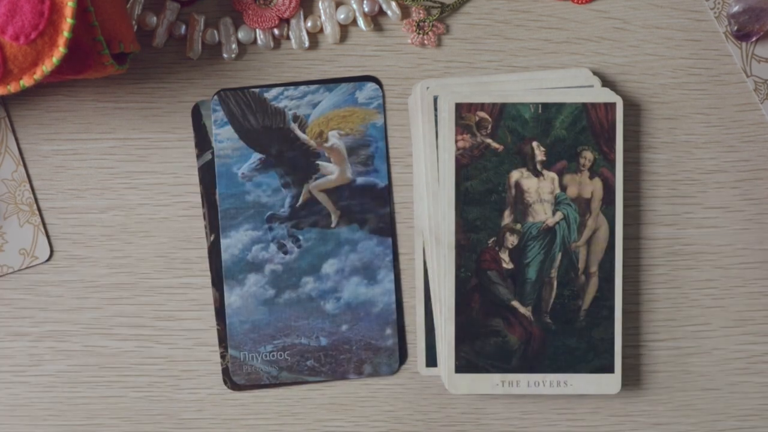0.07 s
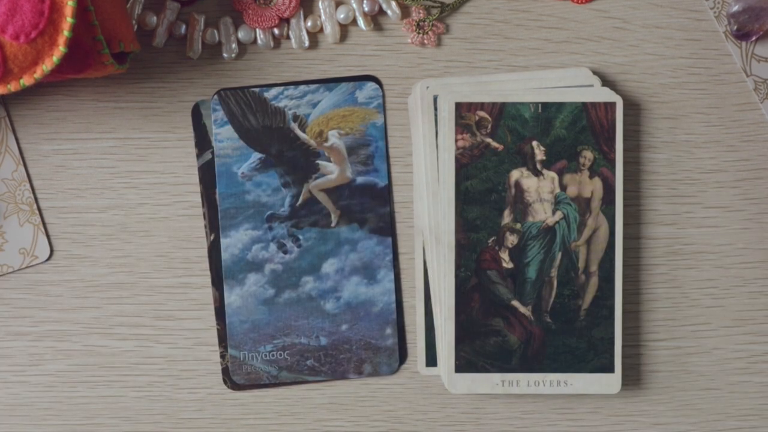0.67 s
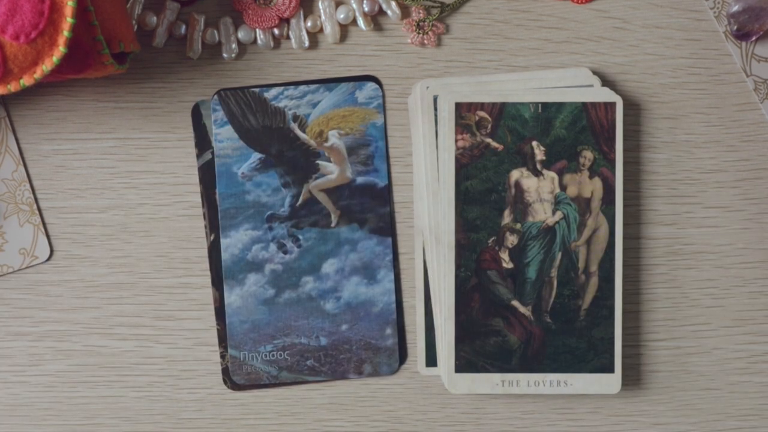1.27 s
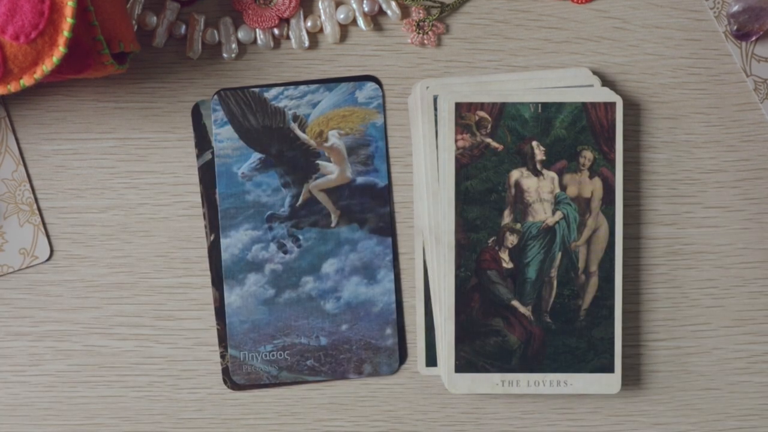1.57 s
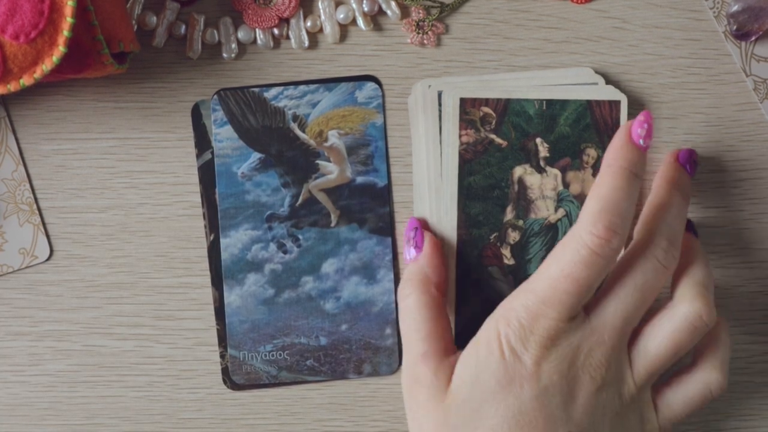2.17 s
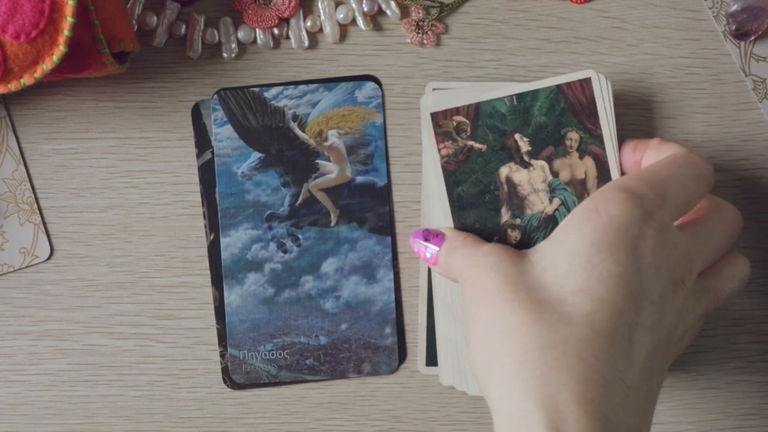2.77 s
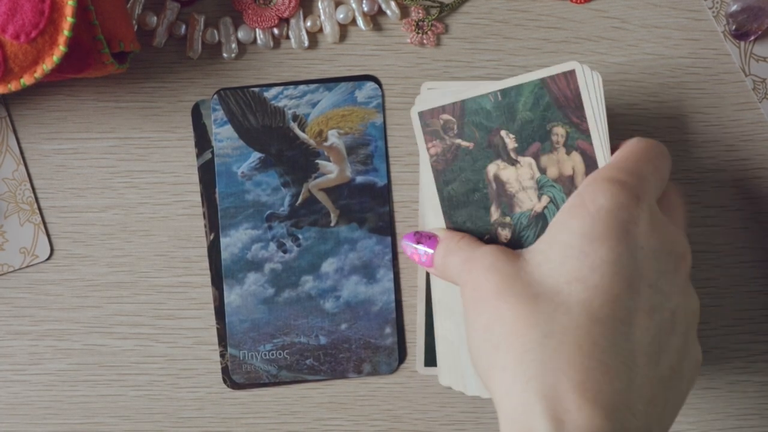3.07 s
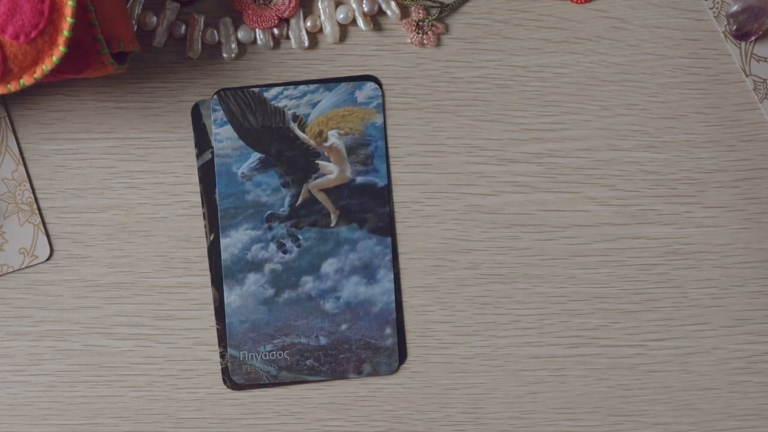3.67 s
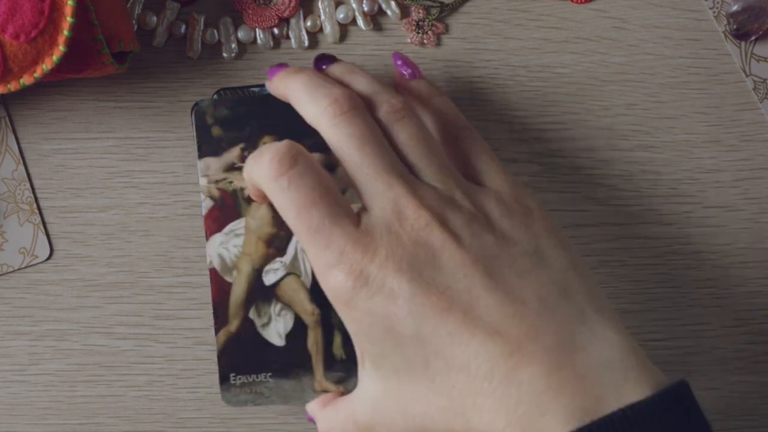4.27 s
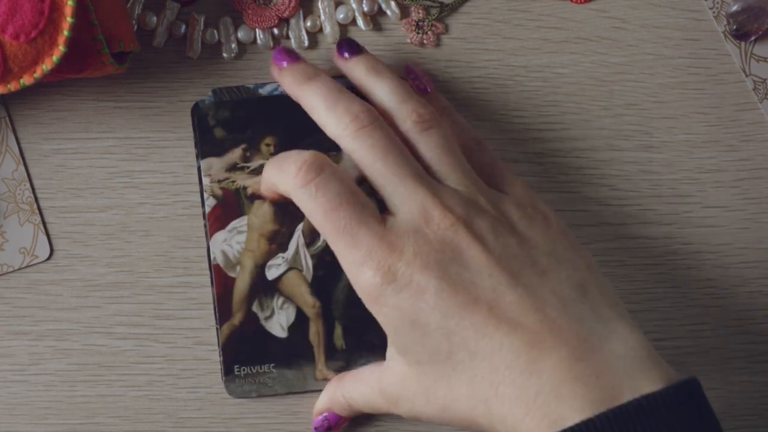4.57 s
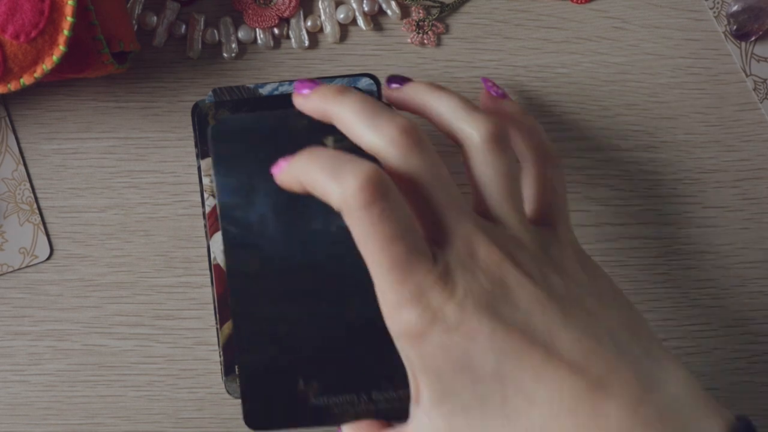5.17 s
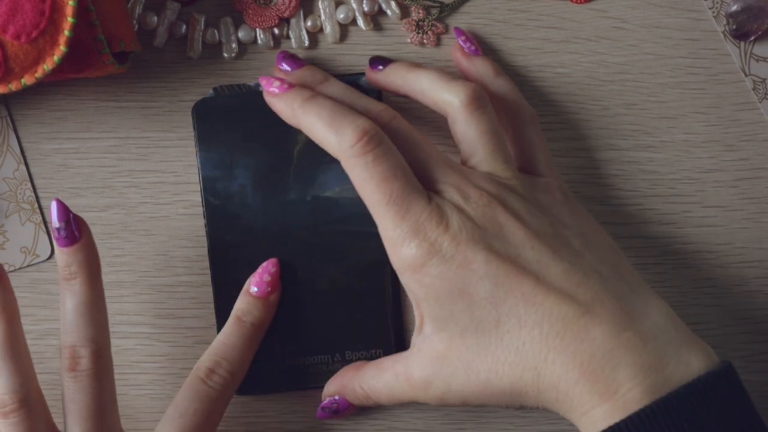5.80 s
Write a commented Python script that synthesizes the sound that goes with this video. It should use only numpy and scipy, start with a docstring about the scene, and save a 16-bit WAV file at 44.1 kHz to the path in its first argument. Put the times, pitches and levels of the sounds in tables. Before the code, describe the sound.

Paper cards brush against each other with small, crisp edge snaps, heard up close in a small, quiet room. A deck scrapes across a wooden tabletop with a low rub, followed by a sharp fingernail tap and thin rasps of bending cards. In the second half, cards are put down twice with short, hollow knocks and clicks. A faint rush of air and fine hiss sit underneath.

```python
"""A quiet room, close to a wooden table where tarot cards are being handled.
Cards rub on each other and on the wood, edges snap free, bent cards sing as they are dragged,
and a fingernail chatters over a packet. Packets and fingers land with a short, hollow ring of the table.
Air rushes faintly behind. Three times the sound dips briefly and comes back with a fine hiss."""
import sys
import numpy as np
from scipy import signal
from scipy.fft import rfft, irfft, next_fast_len
from scipy.io import wavfile
from scipy.ndimage import map_coordinates

SR = 44100
rng = np.random.default_rng(int(sys.argv[2]) if len(sys.argv) > 2 else 0)


def to_wav(sig):
    """Store sig (one row per channel, or 1-D mono) as 16-bit WAV at the path in sys.argv[1].

    Samples outside -1..1 are clipped; the rate is SR.
    """
    pcm = np.clip(np.atleast_2d(sig), -1, 1) * 32767
    pcm = np.round(pcm).astype(np.int16)
    wavfile.write(sys.argv[1], SR, pcm.T)  # frames by channels


N = 266231
TIME = np.arange(N) / SR


def from_db(db):
    """Turn decibels (dB) into a number to multiply by."""
    return 10 ** (np.asarray(db) / 20)


def rms_one(x):
    """Scale a sound so that its average strength (rms) is 1."""
    return x / np.sqrt(np.mean(x ** 2) + 1e-20)


def as_blow(x, length):
    """Give a short sound the energy of one of strength 1 lasting this many seconds."""
    return x / np.sqrt(np.sum(x ** 2) / (length * SR) + 1e-20)


def colour(x, spectrum):
    """Make some pitches louder and others softer, following rows of (Hz, dB)."""
    size = next_fast_len(x.shape[-1])
    hz, db = np.transpose(spectrum)
    bins = np.maximum(np.fft.rfftfreq(size, 1 / SR), 1)
    gain = from_db(np.interp(np.log(bins), np.log(hz), db))
    return irfft(rfft(x, size) * gain, size)[..., :x.shape[-1]]


def cut(x, hz, kind, order=2):
    """Keep what lies below ("low") or above ("high") a pitch."""
    return signal.sosfilt(signal.butter(order, min(hz, .45 * SR), kind, fs=SR, output="sos"), x + 1e-18)


def ring(x, hz, ring_s):
    """Each push starts a tone that fades by 60 dB in its ring time."""
    decay = np.exp(-np.log(1000) / (ring_s * SR))
    feedback = decay * np.cos(2 * np.pi * min(hz, .45 * SR) / SR)
    return signal.lfilter([1, -feedback], [1, -2 * feedback, decay * decay], x + 1e-18)


def drift(rate):
    """Wander at random around zero, to a new value this many times a second."""
    return rms_one(np.interp(TIME * rate, np.arange(N), rng.standard_normal(N)))


def add(out, s, sound):
    """Mix a sound in, starting at second s."""
    start = max(round(s * SR), 0)
    out[..., start:start + sound.shape[-1]] += sound[..., :N - start]


def left_right(mid, side):
    """Both ears share the middle; the side part sets them apart."""
    return np.array([mid + side, mid - side])


# How wide a sound is. Each row: pitch in Hz, level of the side against the middle in dB.
STEREO_WIDTH = [(30, -25), (150, -10.5), (300, -5.5), (600, -6), (1200, -5), (2500, -3.5), (5000, -3),
                (9000, -2.5), (13000, 0)]
def stereo(pair, spectrum, width=1):
    """Colour two noises and spread them out, high pitches wider than low ones."""
    mid, side = colour(pair, spectrum)
    return rms_one(left_right(mid, width * colour(side, STEREO_WIDTH)))


# The colours of the room's steady tone, the air and the hiss. Each row: pitch in Hz, level in dB.
ROOM_COLOUR = [(30, -26.5), (180, 2), (600, -8.5), (1400, -10), (2400, -21), (5000, -29.5), (13000, -40.5)]
AIR_COLOUR = [(25, -32), (70, -11.5), (150, -1), (280, 2.5), (430, 5), (650, 4), (900, 2.5), (1300, -32.5),
              (2100, -16), (3100, -32), (4200, -15), (5000, -38.5), (5700, -23.5), (7000, -54),
              (12000, -90)]
HISS_COLOUR = [(700, -8), (1400, -14), (2200, 11), (3100, -6), (4200, 13.5), (4900, 1), (5700, 6.5),
               (8000, -3), (11800, 4.5), (12900, -43.5), (15500, -40)]
# How the rush of air rises and falls. Each row: time in seconds, level in dB.
AIR_LEVELS = [(0, -69.5), (1.66, -82.5), (1.72, -58.5), (2.62, -53.5), (3.0, -62), (3.9, -62.5), (4.2, -55),
              (4.93, -62), (5.02, -52.5), (6.04, -55)]
# A hollow hum in the air. It lists: pitch in Hz, ring time in seconds, level against the rush in dB.
AIR_HUM = (422, 0.39, -9.5)
# Brief dips in level, made in record(), and the hiss after each.
# Each row: start in seconds, recovery in seconds, hiss level in dB, time the hiss holds in seconds.
DIPS_AND_HISS = [(1.674, 0.027, -63, 0.47), (3.937, 0.078, -66, 0.21), (4.939, 0.059, -65.5, 0.34)]
def background(tone_db=-74.5, air_waver_db=1.14, hiss_waver_db=1.6, floor_db=-91.5, sink_db_per_s=76):
    """Room tone, a low rush of air, and a hiss that comes up at each dip, holds and sinks to a floor."""
    tone = from_db(tone_db) * stereo(rng.standard_normal((2, N)), ROOM_COLOUR)
    rush = stereo(rng.standard_normal((2, N)), AIR_COLOUR)
    hum_hz, ring_s, hum_db = AIR_HUM
    hum = cut(ring(rng.standard_normal(N), hum_hz, ring_s), 2 * hum_hz, "low")
    air_db = np.interp(TIME, *np.transpose(AIR_LEVELS)) + air_waver_db * drift(20)
    air = from_db(air_db) * (rush + from_db(hum_db) * rms_one(hum))
    hiss_gain = np.full(N, from_db(floor_db))
    for s, _, db, hold in DIPS_AND_HISS:
        hiss_gain += (TIME > s) * from_db(db - sink_db_per_s * np.maximum(TIME - s - hold, 0))
    hiss_gain *= from_db(hiss_waver_db * drift(20))
    return tone + air + hiss_gain * stereo(rng.standard_normal((2, N)), HISS_COLOUR)


def swell(s, rise, fade, braking=1.34):
    """A move speeds up, then the hand brakes it. Gives the samples it covers and its speed."""
    span = slice(max(int((s - 3 * rise) * SR), 0), int((s + 7 * fade) * SR))
    t = TIME[span] - s
    return span, np.exp(-np.where(t < 0, (t / rise) ** 2, np.abs(t / fade) ** braking))


def friction(slips_per_s, spread_db, smooth):
    """Paper fibres catch and let go: tiny slips of very uneven size over a smooth rub."""
    sizes = from_db(spread_db * np.minimum(rng.exponential(1, N), 4))
    slips = (rng.random(N) < slips_per_s / SR) * sizes * rng.standard_normal((2, N))
    return rms_one(slips) + smooth * rng.standard_normal((2, N))


def flicker(x, patchy_db=5.5, flickers_per_s=35, patches_per_octave=9):
    """Patches of the rubbing noise's pitch range flicker in and out at random."""
    hz, s, frames = signal.stft(x, SR, nperseg=512)
    place = np.meshgrid(patches_per_octave * np.log2(1 + hz / 1000), s * flickers_per_s, indexing="ij")
    patches = map_coordinates(rng.standard_normal((64, 512)), place, order=1, mode="wrap")
    return signal.istft(frames * rms_one(from_db(patchy_db * patches)), SR)[1][:, :N]


# The tabletop's own tones. Each row: pitch in Hz, level in dB, undamped ring time in seconds.
TABLETOP_TONES = [(158, -2, 0.13), (186, 0, 0.13), (239, 2.5, 0.1), (387, 6, 0.09), (505, -4, 0.08),
                  (543, 2, 0.09), (638, 1.5, 0.11), (786, -2, 0.09), (896, 2, 0.08), (998, 2, 0.08)]
def table_shiver(force, direct):
    """Rubbing shakes the tabletop: its main tones stand out a little from a bed of noise."""
    tones = sum(from_db(db) * ring(force, hz, ring_s) for hz, db, ring_s in TABLETOP_TONES)
    return rms_one(tones) + direct * rms_one(force)


# The colours of a stroke's five parts: airy top sheen on light strokes, card edge, card face,
# tabletop and the hand's weight. Each row: pitch in Hz, level in dB.
SHEEN_COLOUR = [(9000, -24), (12000, 5), (13800, 3.5), (15500, -23)]
EDGE_COLOUR = [(3000, -13), (5000, -2.5), (6200, 0.5), (8000, 2.5), (12000, 5), (13400, -20.5),
               (15500, -35.5)]
FACE_COLOUR = [(600, -17), (1200, -12), (1900, 1.5), (2600, -2), (3300, -2.5), (4300, 0), (5500, -4.5),
               (7500, -12.5), (12000, -42.5)]
WOOD_COLOUR = [(200, -27), (330, -0.5), (500, 8), (680, 4.5), (950, 0.5), (1300, -14.5), (2200, -6),
               (5000, -67)]
WEIGHT_COLOUR = [(25, -56.5), (70, -30.5), (120, -53.5), (165, -3), (250, -5.5), (340, -7), (600, -15),
                 (2000, -83)]
# How those five answer to pressure, in the same order.
# Each row: pressure where it is loudest, level there in dB, loss in dB one unit of pressure away.
PRESSURE_RESPONSE = [(-.1, -11.5, 66), (0, 2.5, 39), (.48, 2, 85), (.85, -2.5, 61.5), (1, -13.5, 48)]
# Rubbing strokes. Each row: peak time, rise and fade in seconds, base level in dB, pressure
# (near 0 an edge brushes, near 0.5 card rubs on card, near 1 the deck is pushed along the table).
RUBS = [ (0.049, 0.055, 0.056, -54.5, 0.077), (0.08, 0.01, 0.02, -46, 0.27), (.15, 0.11, 0.36, -70, 0.3),
        (.21, 0.0035, 0.032, -61.5, 0.079), (0.345, 0.028, 0.04, -46.5, -0.34),
        (0.524, 0.001, 0.014, -52, 0.64), (0.544, 0.013, 0.024, -50.5, 0.54),
        (0.656, 0.0014, 0.027, -47, 0.44), (.676, 0.011, 0.027, -46, 0.49), (.81, 0.04, .03, -71.5, 0.33),
        (1.034, 0.021, 0.034, -45, -0.21), (1.057, 0.015, 0.038, -34.5, 0.49),
        (1.059, 0.01, 0.041, -35.5, 0.87), (1.505, 0.032, 0.062, -73.5, 0.1),
        (1.703, 0.01, 0.057, -43, 0.82), (2.014, 0.014, 0.038, -49.5, 0.41),
        (2.248, 0.017, 0.065, -45.5, 0.73), (2.274, 0.04, 0.04, -48, 0.57), (2.359, 0.012, 0.03, -48, 0.95),
        (2.425, 0.01, 0.02, -37.5, 0.81), (2.449, 0.015, 0.045, -43, 0.81),
        (2.541, 0.013, 0.035, -44.5, 0.96), (2.596, 0.013, 0.019, -51.5, 0.98),
        (2.724, 0.022, 0.03, -44.5, 0.75), (2.771, 0.011, 0.058, -32.5, 1), (2.797, 0.02, 0.028, -33, 0.96),
        (2.91, 0.058, 0.09, -69.5, 0.45), (3.049, 0.014, 0.035, -49.5, 0.65),
        (3.12, 0.032, 0.018, -47.5, 0.81), (3.175, 0.032, 0.035, -53.5, 0.45),
        (3.201, 0.011, 0.031, -39, 0.68), (3.298, 0.0048, 0.075, -54, 0.22),
        (3.518, 0.075, 0.13, -57, 0.23), (3.618, 0.019, 0.026, -46, 0.18),
        (3.675, 0.025, 0.023, -44.5, 0.14), (3.911, 0.012, 0.043, -52.5, 0.18),
        (4.2, 0.11, 0.084, -59.5, 0.43), (4.398, 0.0015, 0.038, -43.5, 0.63),
        (4.427, 0.0069, 0.056, -36.5, 0.83), (4.8, 0.053, 0.12, -72, 0.27),
        (5.165, 0.061, 0.065, -61.5, 0.35), (5.321, 0.013, 0.047, -51.5, 0.57),
        (5.555, 0.0063, 0.004, -42.5, 0.3), (5.601, 0.069, 0.022, -43.5, 0.8),
        (5.921, 0.0085, 0.045, -65, 0.21)]
def strokes(judder_db=1.0, judder_per_s=220, lumps_db=2.5, lumps_per_s=90, table_width=0.3):
    """Lightly held edges hiss, firmer card faces rasp, and under full pressure the table rumbles."""
    power = np.zeros((len(PRESSURE_RESPONSE), N))
    best_pressure, top_db, loss_db = np.transpose(PRESSURE_RESPONSE)
    for s, rise, fade, db, pressure in RUBS:
        span, speed = swell(s, rise, fade)
        gains = from_db(db + top_db - loss_db * (pressure - best_pressure) ** 2)
        power[:, span] += (gains[:, None] * speed) ** 2
    sheen, edge, face, wood, weight = np.sqrt(power)
    judder = rms_one(from_db(judder_db * drift(judder_per_s)))  # the cards stick and slide unevenly
    paper = face * flicker(stereo(friction(slips_per_s=3000, spread_db=3.0, smooth=0.88), FACE_COLOUR))
    paper += edge * flicker(stereo(friction(slips_per_s=6000, spread_db=2.2, smooth=1.0), EDGE_COLOUR))
    paper += sheen * stereo(rng.standard_normal((2, N)), SHEEN_COLOUR)
    shiver = table_shiver(friction(slips_per_s=2500, spread_db=2.0, smooth=.9), direct=2.4)
    lumps = rms_one(from_db(lumps_db * drift(lumps_per_s)))  # the fingers press unevenly
    table = wood * stereo(shiver, WOOD_COLOUR, table_width)
    table += weight * stereo(shiver, WEIGHT_COLOUR, table_width)
    return judder * paper + lumps * table


# A bending card's tones. Each row: multiple of the lowest pitch, level in dB, ring time in seconds.
CARD_TONES = [(1, 18, 0.0072), (1.2, 7.5, 0.0082), (1.501, 1.5, 0.0036), (1.95, -1, 0.0039)]
def card_ring(force, pitch_hz):
    """A card rings as it bends; it is too small to give off anything deeper than these tones."""
    bend = sum(from_db(db) * ring(force, pitch_hz * ratio, ring_s) for ratio, db, ring_s in CARD_TONES)
    return cut(cut(bend, .92 * pitch_hz, "high", order=8), 2.05 * pitch_hz, "low", order=6)


# Card edges snapping free. Each row: time in seconds, level in dB, lowest pitch in Hz,
# time the slips take to fade in seconds, crack strength in dB.
EDGE_SNAPS = [ (0.0567, -40.5, 2900, 0.004, 1.5), (0.209, -54.5, 5800, 0.00096, -5),
              (0.5444, -37, 1610, 0.0015, -2), (.545, -36.5, 4870, 0.00073, -19),
              (0.582, -54, 4670, .0007, -22), (.8823, -36, 4120, 0.00079, -38),
              (0.886, -33, 2200, 0.00026, -11.5), (0.9144, -42, 2950, 0.00012, -18),
              (1.036, -41.5, 1870, 0.0013, -11), (1.593, -62.5, 2610, 0.004, 9),
              (1.653, -55.5, 6560, 0.00071, 21), (2.242, -42, 1660, 0.0011, 5.5),
              (3.198, -38, 1970, 0.0019, -24), (3.381, -52.5, 1910, 0.0013, -6),
              (3.461, -49, 1920, 0.0034, 5), (3.529, -50.5, 2000, 0.002, -3),
              (3.608, -39, 2050, 0.0027, -2), (3.625, -40.5, 2360, 0.00089, -3),
              (3.6635, -37.5, 2400, 0.00077, 18), (3.6843, -42, 2020, 0.00057, -2),
              (3.691, -40, 2190, .003, 5), (3.912, -49, 5840, 0.00031, 6),
              (4.235, -49.5, 1930, 0.00057, -5), (4.451, -41, 2220, 0.0019, -1),
              (4.4575, -35.5, 2830, 0.0018, -3), (4.477, -43.5, 5500, 0.0028, 22),
              (5.31, -48.5, 3160, 0.00021, 4), (5.518, -42.5, 2290, 0.00039, -4.5),
              (5.5253, -39.5, 1680, 0.00095, -12), (5.5353, -36.5, 2700, 0.0029, -5)]
def snaps(crack_trim_db=-2, crack_top_hz=8200, crack_width=0.42, bend_width=0.35, build_up=0.46):
    """An edge lets go in a quick run of slips: the card rings, with a dry crack on top."""
    out, t = np.zeros((2, N)), TIME[:SR // 20] - .01
    for s, db, pitch_hz, length, crack_db in EDGE_SNAPS:
        spread_s = length * np.where(t < 0, build_up, 1)
        slips = rng.standard_normal((4, len(t))) * np.exp(-(t / spread_s) ** 2 / 2)
        slips[::2, np.searchsorted(t, 0)] += 2.2  # one sharp release
        bend = card_ring(slips[:2], pitch_hz)
        crack = cut(cut(slips[2:], pitch_hz, "high", order=4), crack_top_hz, "low", order=3)
        crack_gain = from_db(crack_db + crack_trim_db)
        mid = rms_one(bend[0]) + crack_gain * rms_one(crack[0])
        side = bend_width * rms_one(bend[1]) + crack_width * crack_gain * rms_one(crack[1])
        add(out, s + t[0], from_db(db) * as_blow(left_right(mid, side), length=0.0098))
    return out


# Blows on the table. Each row: start in seconds, level in dB, pitch in Hz above which it is dulled.
TABLE_KNOCKS = [(.058, -55, 1220), (0.5447, -50, 2435), (0.658, -54, 576), (1.065, -40, 109),
                (1.092, -40.5, 113), (1.708, -47.5, 1220), (2.243, -50.5, 500), (2.75, -42.5, 200),
                (3.199, -40.5, 1740), (4.401, -38, 400), (4.418, -33, 327), (4.457, -25, 1000),
                (5.525, -36.5, 430), (5.5365, -35, 380), (5.604, -39.5, 257)]
def knocks(damping=0.81, slap=0.81, slap_s=0.0046, lowest_hz=162):
    """A packet or finger lands: the tabletop rings, damped by the hand, and trapped air slaps out."""
    out, t = np.zeros(N), TIME[:SR // 3]
    click = signal.unit_impulse(len(t))
    for s, db, contact_hz in TABLE_KNOCKS:
        scatter_db = rng.normal(0, 1.5, len(TABLETOP_TONES))
        tones = sum(from_db(tone_db + extra_db) * ring(click, hz, ring_s * damping)
                    for (hz, tone_db, ring_s), extra_db in zip(TABLETOP_TONES, scatter_db))
        puff = cut(rng.standard_normal(len(t)) * np.exp(-t / slap_s), 2100, "low")
        blow = rms_one(tones) + slap * rms_one(puff)
        blow = cut(cut(blow, contact_hz, "low"), lowest_hz, "high", order=6)
        add(out, s, from_db(db) * as_blow(blow, length=0.016))
    return np.array([out, out])


# Bent cards being dragged. Each row: peak time and fade in seconds, level in dB, lowest pitch in Hz.
CARD_DRAGS = [(0.813, .06, -67, 3140), (1.033, 0.026, -41.5, 3360), (2.797, 0.017, -39, 980),
              (2.869, 0.072, -58, 1790), (3.118, 0.01, -46, 1640), (3.182, 0.12, -48.5, 1830),
              (3.512, 0.064, -57, 2030), (3.68, 0.01, -42, 2170), (4.658, 0.063, -63, 2040)]
def drags(width=0.44, flex_octaves=0.068, flexes_per_s=22):
    """Slips along an edge keep a bent card ringing; its pitch shifts as it flexes."""
    out = np.zeros((2, N))
    slips = friction(slips_per_s=6000, spread_db=1.5, smooth=0.5)
    flex = 2 ** (flex_octaves * drift(flexes_per_s))
    for s, fade, db, pitch_hz in CARD_DRAGS:
        span, speed = swell(s, rise=.004 + .36 * fade, fade=fade)
        bend = card_ring(slips[:, span], pitch_hz)
        place = np.cumsum(flex[span]) % len(speed)  # reading faster raises the pitch
        mid, side = [np.interp(place, np.arange(len(speed)), x) for x in bend]
        out[:, span] += from_db(db) * speed * rms_one(left_right(mid, width * side))
    return out


# The tones of a packet of cards held in the hand. Each row: pitch in Hz, level in dB.
PACKET_TONES = [(1670, 1), (2030, 4.5), (2260, 2), (2560, -1), (2950, -2.5)]
# Fingernail taps. Each row: time in seconds, level in dB, time to swell or fade in seconds,
# pitch in Hz above which it is dulled.
NAIL_TAPS = [(1.207, -39.5, 0.003, 2000), (3.0937, -36.5, 0.0014, 2960), (3.296, -27, 0.0049, 3000)]
def taps(ring_s=0.0072, crack_db=-10, width=0.21, lowest_hz=1450):
    """A fingernail chatters over the edges of a stiff packet: a round knock with hardly any crack."""
    out, t = np.zeros((2, N)), TIME[:SR // 15] - .015
    for s, db, length, contact_hz in NAIL_TAPS:
        slips = rng.standard_normal((2, len(t))) * np.exp(-(t / length) ** 2 / 2)
        slips[0, np.searchsorted(t, 0)] += 2.2  # one sharp release
        body = sum((-1) ** k * from_db(tone_db) * ring(slips, hz, ring_s)
                   for k, (hz, tone_db) in enumerate(PACKET_TONES))
        tap = rms_one(body) + from_db(crack_db) * rms_one(slips)
        mid, side = cut(cut(tap, contact_hz, "low"), lowest_hz, "high", order=6)
        add(out, s + t[0], from_db(db) * as_blow(left_right(mid, width * side), length=0.009))
    return out


def room(x, echo_db=-16.5, ring_s=0.16, wall_hz=5500, width=0.59, wide_above_hz=700):
    """A small furnished room adds a short, dull echo; deep sounds reach left and right alike."""
    t = TIME[:SR // 2]
    tails = cut(rng.standard_normal((2, len(t))), wall_hz, "low", order=1)
    tails *= np.exp(-np.log(1000) * t / ring_s) * (t > .004)
    mid, side = tails / np.sqrt(np.sum(tails ** 2, axis=1, keepdims=True))
    side = width * cut(side, wide_above_hz, "high", order=1)
    return from_db(echo_db) * signal.fftconvolve(x, left_right(mid, side), axes=1)[:, :N]


def scene():
    """Cards and table in the room, over the background."""
    handling = strokes() + drags() + snaps() + taps() + knocks()
    return handling + room(handling) + background()


def record(dry, dip_db=-30, top_hz=15700):
    """The level dips briefly three times, and the very highest pitches are cut away."""
    gain, low = np.ones(N), from_db(dip_db)
    for s, recovery, *_ in DIPS_AND_HISS:
        gain *= np.interp(TIME, [s - .006, s, s + 0.013, s + 0.0027 + recovery], [1, low, low, 1])
    return signal.sosfilt(signal.ellip(10, .1, 80, top_hz, fs=SR, output="sos"), dry * gain)


dry = scene()
out = record(dry)
to_wav(out)
```